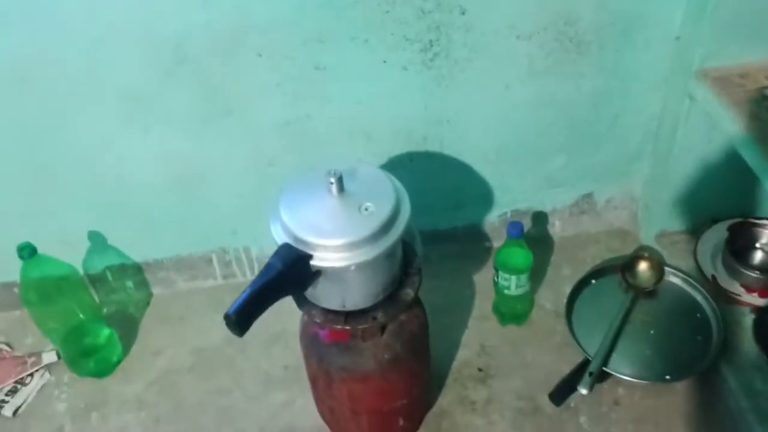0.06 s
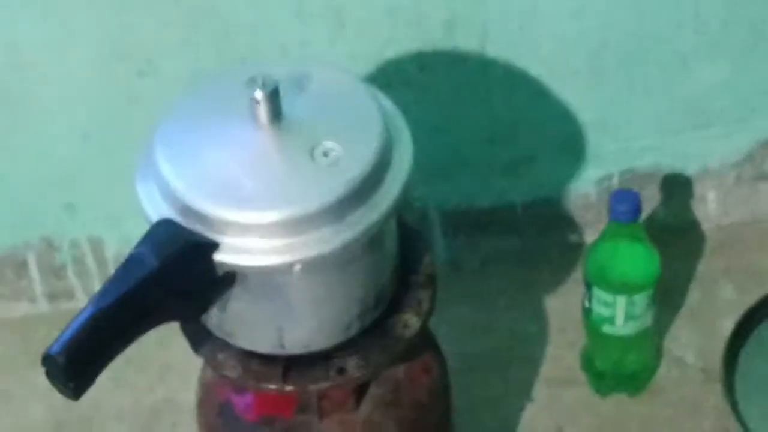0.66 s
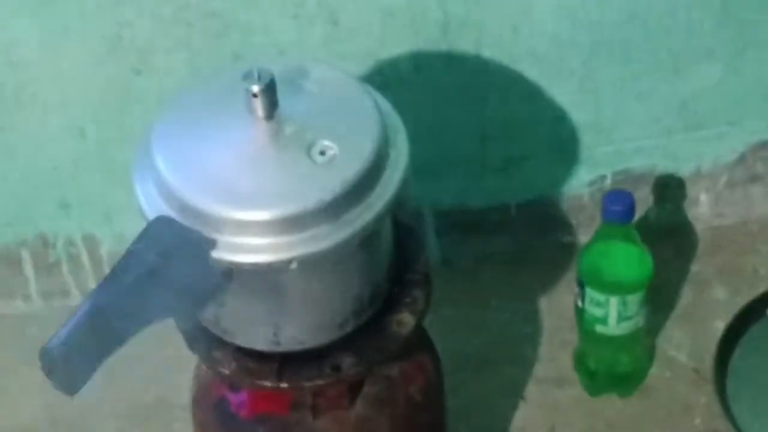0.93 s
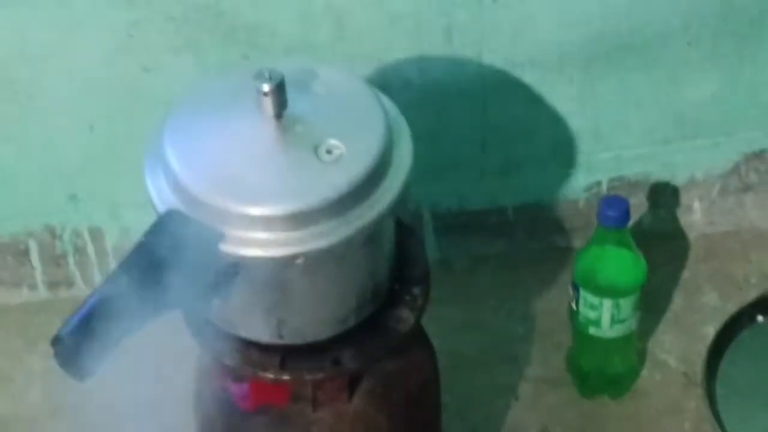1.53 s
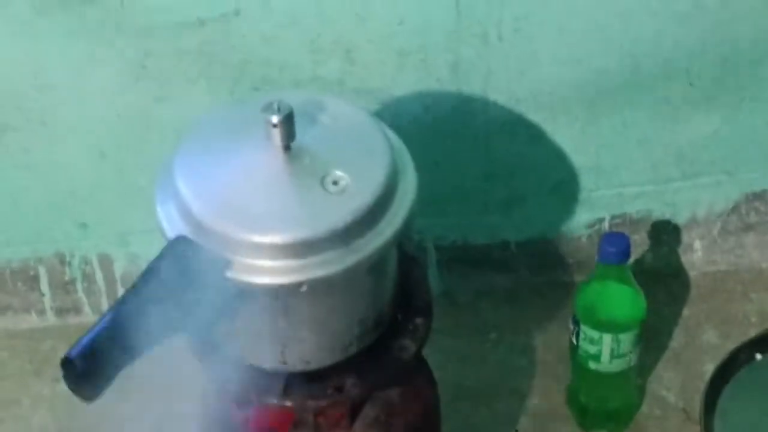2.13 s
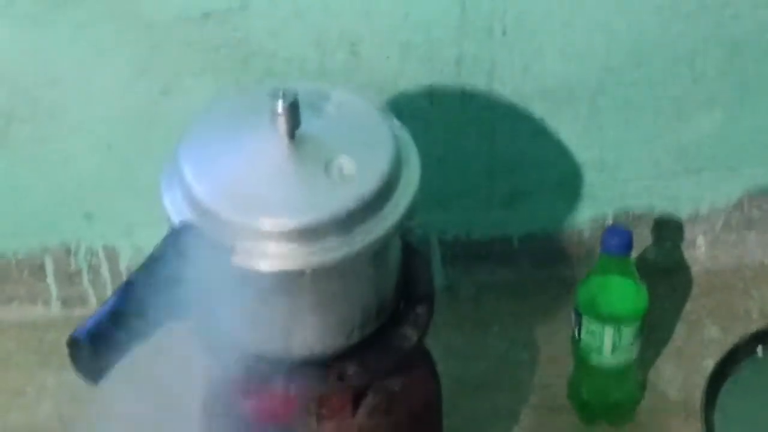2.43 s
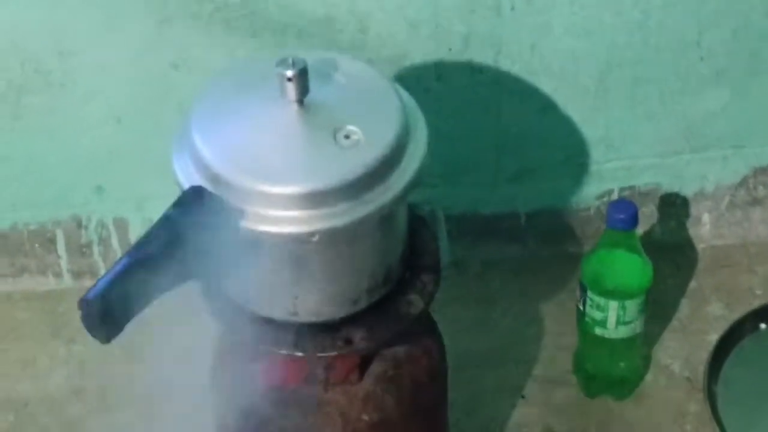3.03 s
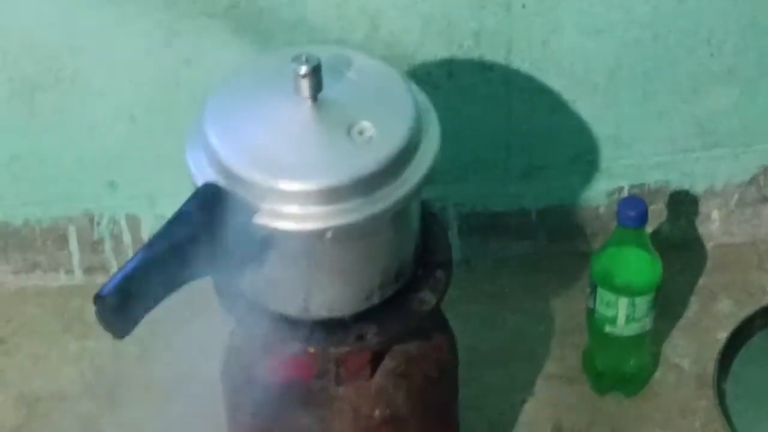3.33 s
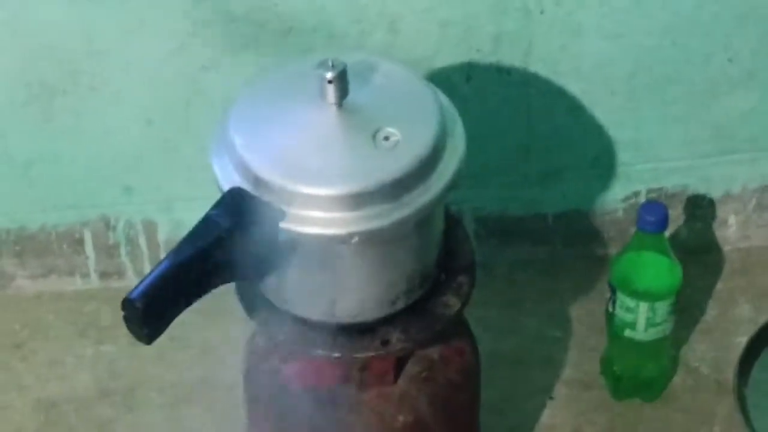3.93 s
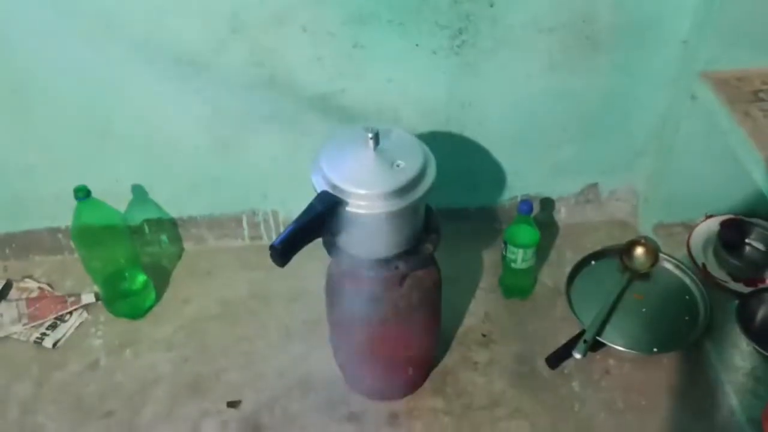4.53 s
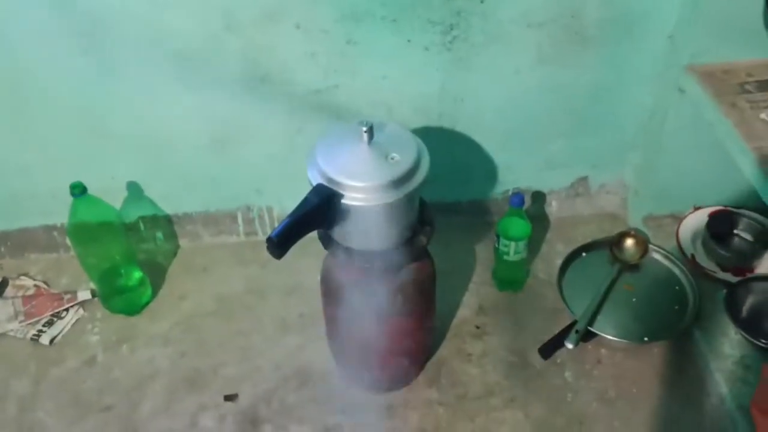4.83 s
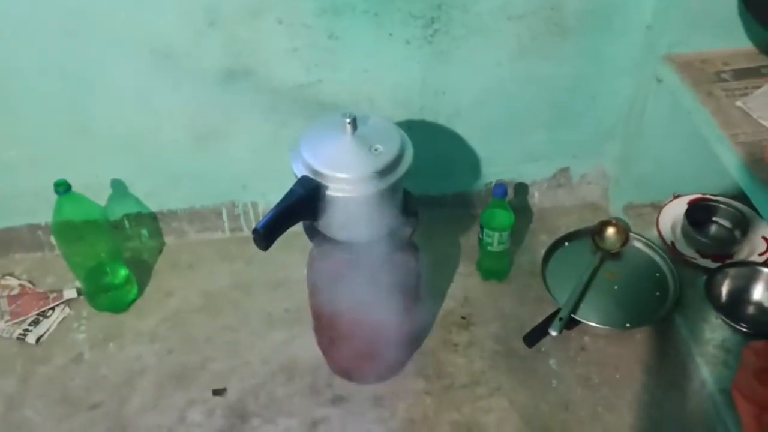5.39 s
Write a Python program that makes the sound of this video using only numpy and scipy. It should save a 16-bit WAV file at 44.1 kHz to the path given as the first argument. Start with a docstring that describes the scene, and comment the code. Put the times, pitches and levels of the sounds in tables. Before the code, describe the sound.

Close to a wall, a hand-held microphone picks up a short, dull pop and the faint, wavering hiss of a leaking pressure cooker. The leak suddenly gushes open into a loud, steady blast of steam, slightly sputtering and stronger on the left. A soft draught rumbles on the right side underneath it. The hiss keeps going without a break, turning a little thinner and brighter near the end.

```python
"""At a gas stove, a pressure cooker leaks a thin, warbling hiss through a narrow, wet gap by its handle.
The gap opens with a hollow gush, and a loud, steady jet of steam follows, its turbulence heard as noise.
Wall and floor reflect the hiss into a hand-held camera with two microphone ports facing different ways.
Before the jet the left port pops once and the camera bumps softly; under the jet, draughts rumble on the
right port and buffet the camera body."""
import sys
import numpy as np
from scipy import signal
from scipy.fft import rfft, irfft, next_fast_len
from scipy.io import wavfile
from scipy.ndimage import map_coordinates

SR = 44100
rng = np.random.default_rng(int(sys.argv[2]) if len(sys.argv) > 2 else 0)


def generate_wav(signal):
    """Clip the signal to [-1, 1] and save it as 16-bit WAV at the path in sys.argv[1]."""
    frames = np.transpose(np.atleast_2d(signal))
    scaled = np.clip(frames, -1, 1) * 32767
    pcm = np.round(scaled).astype(np.int16)
    wavfile.write(sys.argv[1], SR, pcm)


N = 249401

OPEN_S = 0.89  # the moment at which the gap is half open
# Slow drift of the jet's treble. Each row: time in seconds, relative level in dB.
TREBLE_DRIFT = [(1.0, -0.5), (1.4, 1), (1.8, -2), (2.2, -3), (2.85, 0.3), (3.4, -2), (3.8, -4), (4.1, -5),
                (4.55, -0.3), (5.66, -1)]


def seconds():
    """The time of each sample."""
    return np.arange(N) / SR


def amp(db):
    """Decibels as an amplitude ratio."""
    return 10 ** (np.asarray(db) / 20)


def unit(x):
    """Normalisation to an rms of 1."""
    return x / np.sqrt(np.mean(x ** 2) + 1e-20)


def gains(spectrum, hz):
    """Amplitude response of each dB column of a spectrum, interpolated in log frequency."""
    knots_hz, *columns = np.transpose(spectrum)
    return np.array([amp(np.interp(np.log(hz + 1), np.log(knots_hz + 1), db)) for db in columns])


def curve(rows):
    """Linear interpolation of (seconds, value) rows at every sample."""
    return np.interp(seconds(), *np.transpose(rows))


def ramp(start_s, length_s):
    """A raised-cosine step from 0 to 1."""
    return np.sin(np.pi / 2 * np.clip((seconds() - start_s) / length_s, 0, 1)) ** 2


def spells(rows, attack_s, release_s, sag_db_per_s=0):
    """A sum of envelopes, each with an attack, a hold that may decay exponentially, and a release."""
    return sum(ramp(start, attack_s) * (1 - ramp(end, release_s))
               * amp(db - sag_db_per_s * (seconds() - start)) for start, end, db in rows)


def wobble(rate_hz):
    """Random modulation: a spline through rate_hz Gaussian values a second."""
    knots = rng.standard_normal(int(N * rate_hz / SR) + 4)
    return map_coordinates(knots, [seconds() * rate_hz])


def filtered(x, response):
    """Linear filtering: the spectrum of x times a complex function of frequency."""
    size = next_fast_len(N + SR // 2)
    hz = np.fft.rfftfreq(size, 1 / SR)
    return irfft(rfft(x, size) * response(hz), size)[..., :N]


def noise(spectrum, channels=2):
    """Coloured noise of rms 1, uncorrelated between the ports."""
    white = rng.standard_normal((channels, N))
    return unit(filtered(white, lambda hz: gains(spectrum, hz)))


def ringing(modes):
    """Forced resonance: stereo noise drives damped modes of alternating sign; the sum has rms 1."""
    def response(hz):
        return sum((-1) ** k * amp(db) * 1j * hz * width / (centre ** 2 - hz ** 2 + 1j * hz * width)
                   for k, (centre, width, db) in enumerate(modes))
    return unit(filtered(rng.standard_normal((2, N)), response))


def patchy(x, depth_db, width_hz, life_s):
    """Intermittency, as of eddies that come and go: random patches of gain in frequency and time."""
    hop = 512
    spectra = signal.stft(x, nperseg=2 * hop)[2]
    band, frame = np.indices(spectra.shape[1:])
    place = [band * SR / (2 * hop) / width_hz, frame * hop / SR / life_s]
    patches = [map_coordinates(rng.standard_normal(band.shape), place, mode="wrap") for _ in spectra]
    spectra = spectra * amp(depth_db * np.array(patches))
    return unit(signal.istft(spectra, nperseg=2 * hop)[1][:, :N])


def leak():
    """Flow through a constriction: steam hisses and excites the wet gap until the jet takes over."""
    # Spectrum of the leak. Each row: frequency in Hz, left and right relative levels in dB.
    hiss_spectrum = [(400, -26, -32), (1100, -30.5, -37), (1600, -19.5, -29), (2550, -17, -26),
                     (3670, 0, -33), (4300, -4, -17), (5170, 1.5, -6.5), (6000, -4, -19), (7500, -10, -8.5),
                     (9300, -25, -20.5), (12000, -17, -18.5), (15400, -29, -19)]
    # Resonances of the wet gap. Each row: frequency in Hz, bandwidth in Hz, relative level in dB.
    wet_gap_modes = [(1514, 60, -7), (1730, 65, -11), (2170, 90, -2.5), (2510, 140, -1), (2780, 170, -0.5),
                     (3320, 380, -3)]
    hiss = patchy(noise(hiss_spectrum), depth_db=3.0, width_hz=253, life_s=0.098)
    hiss *= amp(-45.5 + 0.5 * wobble(11))
    warble = patchy(ringing(wet_gap_modes), depth_db=4.5, width_hz=82, life_s=0.066) * amp([[4], [-7]])
    swell_db = 5.5 * np.exp(-((seconds() - 0.44) / 0.05) ** 2)  # one swell, peaking at 0.44 s
    warble *= amp(-57.5 + swell_db) * ramp(start_s=0.02, length_s=0.18)
    return (1 - ramp(start_s=0.81, length_s=0.15)) * (hiss + warble)


def walls(x, spread_s, count=60):
    """Comb filtering: near surfaces return delayed copies that interfere differently at each port."""
    impulse_responses = np.zeros((2, SR // 4))
    for port in impulse_responses:
        delay_s = np.clip(0.003 + rng.exponential(spread_s, count), 0, 0.2)
        port[(delay_s * SR).astype(int)] = rng.choice([-1, 1], count) / np.sqrt(count)
    return signal.fftconvolve(x, impulse_responses, axes=1)[:, :N]


def moving_walls(x, patterns=7):
    """Direct plus reflected sound: as the hand drifts, one interference pattern fades into the next."""
    place = np.linspace(0, patterns - 1, N)
    fades = np.cos(np.pi / 2 * np.clip(place - np.arange(patterns)[:, None], -1, 1))
    echoes = sum(fade * walls(x, spread_s=0.008) for fade in fades)
    return x + amp(-7.0) * echoes


def background():
    """Ambient noise: a faint, flickering floor, strongest at low frequencies."""
    # Spectrum of the background. Each row: frequency in Hz, relative level in dB.
    ambient_spectrum = [(20, -16), (100, -3), (250, 1.5), (400, -5), (800, -10), (2000, -12.5),
                        (10000, -23)]
    return amp(-71) * patchy(noise(ambient_spectrum), depth_db=4.0, width_hz=150, life_s=0.051)


def pop():
    """A pressure transient: one dull pull and push on the left port alone, with a faint short tail."""
    # The pressure pulse. Its one row: time in seconds, peak level of the swing in dB.
    pulse = [(0.165, -8)]
    # Spectrum of the pulse. Each row: frequency in Hz, relative level in dB.
    pulse_spectrum = [(20, -40), (70, -7), (170, 4.5), (350, 4), (700, -9), (1200, -13.5), (2400, -18.5),
                      (2900, -62), (8000, -70)]
    (time_s, peak_db), = pulse
    age = (np.arange(N) - round(time_s * SR)) / SR
    impulse = 1.0 * (age == 0)
    # a quarter-cycle phase shift gives the swing two opposite lobes
    swing = filtered(impulse, lambda hz: -1j * gains(pulse_spectrum, hz))
    tail_db = -32.5 - 60 * np.abs(age) / 0.11  # falls 60 dB in 0.11 s
    tail = amp(tail_db) * (age > 0) * noise(pulse_spectrum, channels=1)
    return amp(peak_db) * (swing / np.abs(swing).max() + tail) * np.array([[1], [0]])


def bumps():
    """Gaussian tone bursts: soft low bumps of the camera and faint, short higher tones."""
    # Each row: centre time in seconds, frequency in Hz, half-width in seconds, envelope peak in dB.
    bursts = [(0.41, 130, 0.02, -57), (0.59, 138, 0.023, -57), (0.822, 140, 0.022, -46),
              (0.401, 590, 0.027, -63), (0.53, 600, 0.018, -65)]
    t = seconds()
    return sum(amp(db) * np.exp(-((t - centre) / width) ** 2) * np.sin(2 * np.pi * hz * (t - centre))
               for centre, hz, width, db in bursts)


def gush():
    """Resonance of the opening gap: the first slug of steam sounds briefly hollow."""
    # Modes of the gap. Each row: frequency in Hz, bandwidth in Hz, relative level in dB.
    gap_modes = [(442, 50, -7.5), (560, 63, -8), (716, 120, -5.5), (970, 82, 3.5), (1590, 330, -1.5)]
    peak_s, attack_s, decay_db_per_s = 0.9295, 0.07, 165
    decay_db = decay_db_per_s * np.maximum(seconds() - peak_s, 0)
    return amp(-30 - decay_db) * ramp(peak_s - attack_s, attack_s) * ringing(gap_modes)


def jet():
    """Turbulent mixing noise: large eddies roar, the core hisses, fine eddies fizz and the pot rings."""
    # Spectrum of the jet. Each row: frequency in Hz, left and right relative levels in dB.
    jet_spectrum = [(252, -74, -54), (536, -47, -48), (1030, -30.5, -27.5), (1604, -17.5, -20),
                    (2460, -7, -13), (3270, -4, -12), (4570, -6, -11), (5580, 3, -6), (6770, -3.5, -7),
                    (8100, -13, -10), (9000, -21, -14), (11350, -6, -16), (12240, -3.5, -8.5),
                    (16000, -12.5, -13.5)]
    # Broad resonances of a bright sheen. Each row: frequency in Hz, bandwidth in Hz, relative level in dB.
    sheen_modes = [(6320, 350, 3), (10100, 1100, -6), (11400, 800, 0.5), (12300, 630, -3)]
    # Narrow modes of the pot. Each row: frequency in Hz, bandwidth in Hz, relative level in dB.
    pot_modes = [(944, 20, -22), (1013, 25, -9), (1449, 65, -1.5), (3346, 52, 2.5)]

    def below(hz, edge_hz):
        return 1 / (1 + (hz / edge_hz) ** 10)

    steam = patchy(noise(jet_spectrum), depth_db=0.68, width_hz=428, life_s=0.09)
    roar = filtered(steam, lambda hz: below(hz, edge_hz=4444))
    roar = patchy(roar, depth_db=1.42, width_hz=110, life_s=0.04)
    core = unit(filtered(steam, lambda hz: below(hz, edge_hz=9170) - below(hz, edge_hz=4740)))
    fizz = unit(filtered(steam, lambda hz: 1 - below(hz, edge_hz=8400)))

    age = seconds() - OPEN_S
    roar_sag_db_per_s, pot_sag_db_per_s = 0.11, 1.4  # falling pressure weakens both
    drawn_back = ramp(start_s=4.37, length_s=0.57)  # the camera draws back: less roar, more sheen
    facing = np.array([[1.25], [0.3]])  # the left port faces the jet, so its colour changes most
    treble_db = curve(TREBLE_DRIFT)  # what the fizz gains, roar and core partly lose
    roar_db = -3 - roar_sag_db_per_s * age - facing * (0.35 * treble_db + 1.2 * drawn_back)
    core_db = -1.3 - facing * 0.18 * treble_db
    fizz_db = -0.37 + facing * treble_db
    hiss = amp(roar_db + 0.27 * wobble(18)) * roar
    hiss += amp(core_db + 0.56 * wobble(18)) * core
    hiss += amp(fizz_db + 0.65 * wobble(17)) * fizz
    hiss += drawn_back * amp([[-4], [-12]]) * ringing(sheen_modes)
    hiss += amp(-20 - pot_sag_db_per_s * age) * ringing(pot_modes)

    # wet steam sputters in the gap, modulating all parts together
    sputter_db = 0.4 * wobble(16) + 0.43 * wobble(35) + 0.5 * wobble(160)
    widening_s = 0.03  # time constant of the opening gap
    opening = 0.5 + 0.5 * np.tanh(age / (2 * widening_s))
    return amp(-22.5 + sputter_db) * opening * hiss


def rush():
    """Turbulence in the plume: a low-middle flutter that rises and falls with the jet's treble."""
    # Spectrum of the plume. Each row: frequency in Hz, relative level in dB.
    plume_spectrum = [(120, -38), (250, -17), (420, -1.5), (650, 1.5), (1000, 4), (1600, -28)]
    sag_db_per_s = 1.13
    level_db = -51 + 1.3 * curve(TREBLE_DRIFT) - sag_db_per_s * (seconds() - OPEN_S)
    flutter = patchy(noise(plume_spectrum), depth_db=6.0, width_hz=117, life_s=0.06)
    return amp(level_db) * ramp(OPEN_S, length_s=0.079) * flutter * amp([[0], [-8]])


def draught():
    """Wind noise: eddies press mostly on the right port, in one long draught and two weak returns."""
    # The draughts. Each row: start in seconds, end in seconds, initial level at the right port in dB.
    gusts = [(0.97, 3.67, -40), (3.7, 4.1, -49.5), (4.23, 4.48, -49.5)]
    # Spectrum of their rumble. Each row: frequency in Hz, relative level in dB.
    rumble_spectrum = [(20, -24), (45, -19), (90, -3.5), (160, 0), (500, 1.5), (900, 1.5), (1400, -4),
                       (2500, -22), (5000, -60)]
    strength = spells(gusts, attack_s=0.036, release_s=0.068, sag_db_per_s=1.35)
    eddies = patchy(noise(rumble_spectrum, channels=1), depth_db=2.5, width_hz=135, life_s=0.04)
    lumps = unit(amp(0.56 * wobble(13) + 2.2 * wobble(90)) * eddies)
    return strength * lumps * amp([[-26], [0]])


def buffet():
    """Buffeting: unsteady pressure on the camera body makes soft low thuds, stronger on the right."""
    # Spells of buffeting. Each row: start in seconds, end in seconds, level in dB before the port gains.
    gusts = [(0.98, 4.1, -60), (3.97, 4.72, -60), (4.82, 4.93, -67)]
    # Spectrum of the thuds. Each row: frequency in Hz, relative level in dB.
    thud_spectrum = [(20, -16), (50, -6.5), (90, -1), (150, 4.5), (220, -5), (400, -24), (1000, -45)]
    resting_db, port_gains = -79, amp([[-8], [1]])
    strength = amp(resting_db) + spells(gusts, attack_s=0.06, release_s=0.057) * port_gains
    return strength * amp(1.7 * wobble(14)) * noise(thud_spectrum)


def scene():
    """Superposition: the cooker with its reflections, the background and the sounds at the camera."""
    cooker = moving_walls(leak() + jet() + gush() + rush())
    return cooker + background() + draught() + buffet() + pop() + bumps()


def record(dry):
    """Band limiting: the camera passes nothing above its cutoff frequency."""
    cutoff_hz = 15750
    return filtered(dry, lambda hz: hz < cutoff_hz)


dry = scene()
out = record(dry)
generate_wav(out)
```